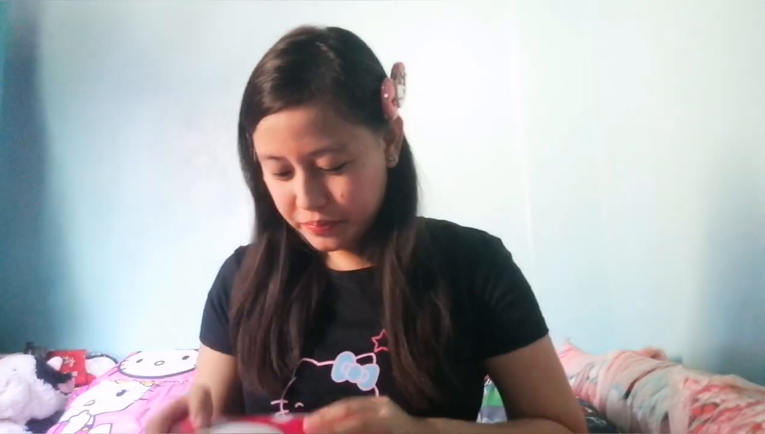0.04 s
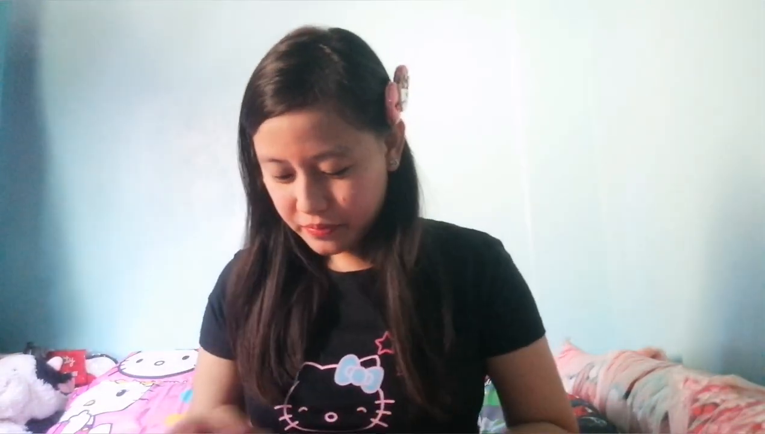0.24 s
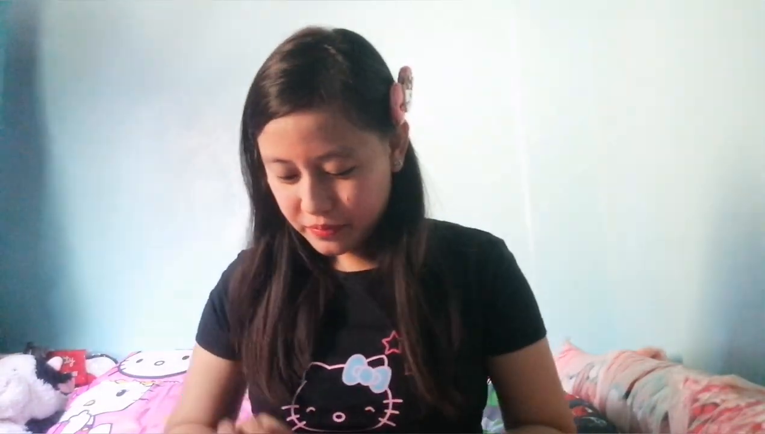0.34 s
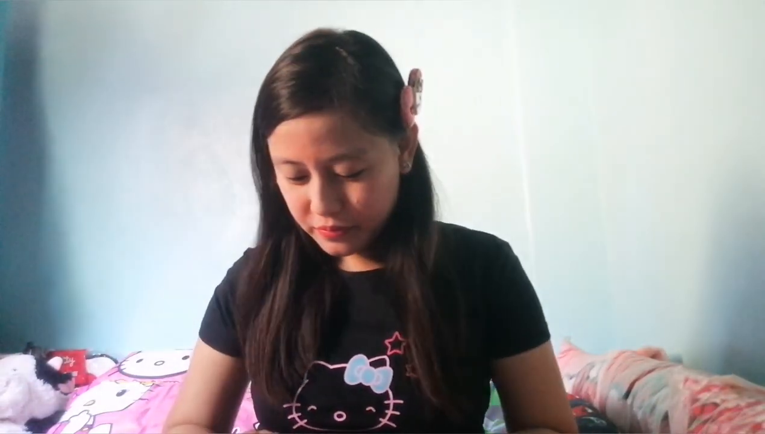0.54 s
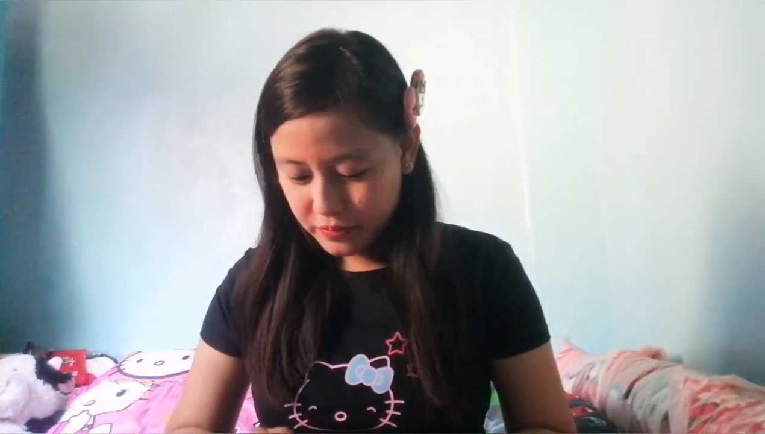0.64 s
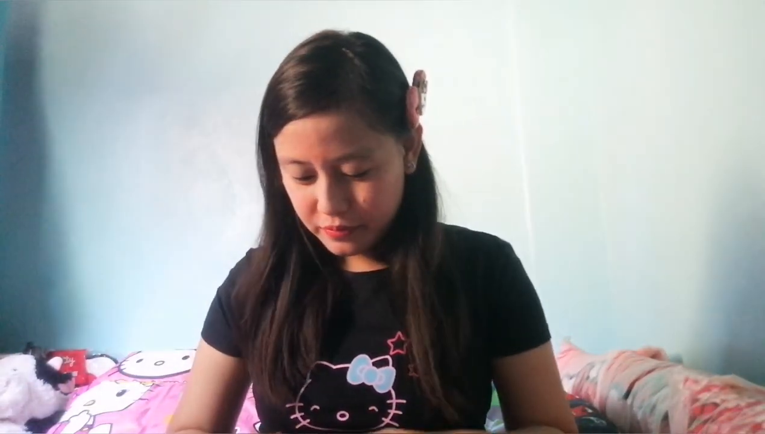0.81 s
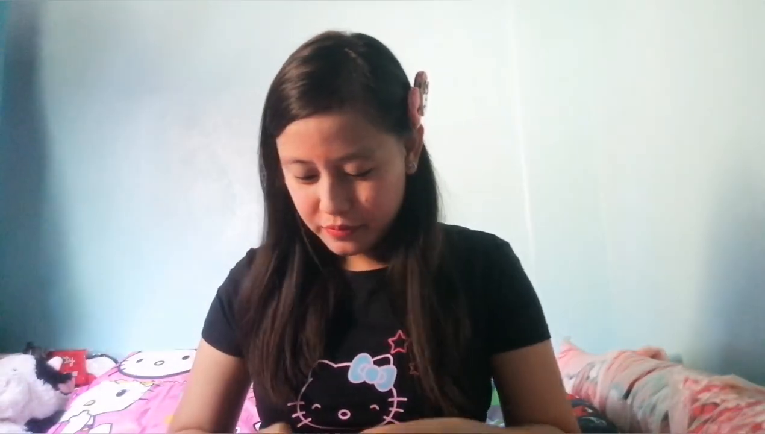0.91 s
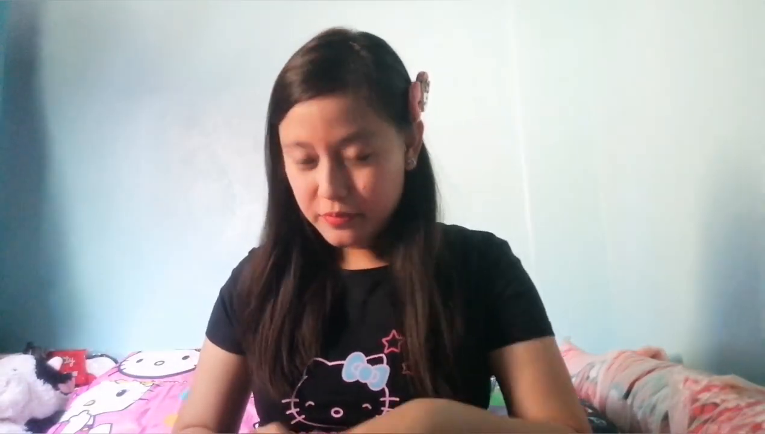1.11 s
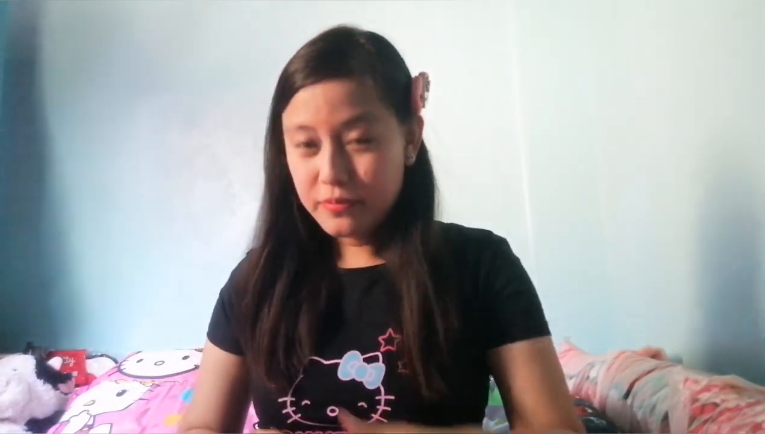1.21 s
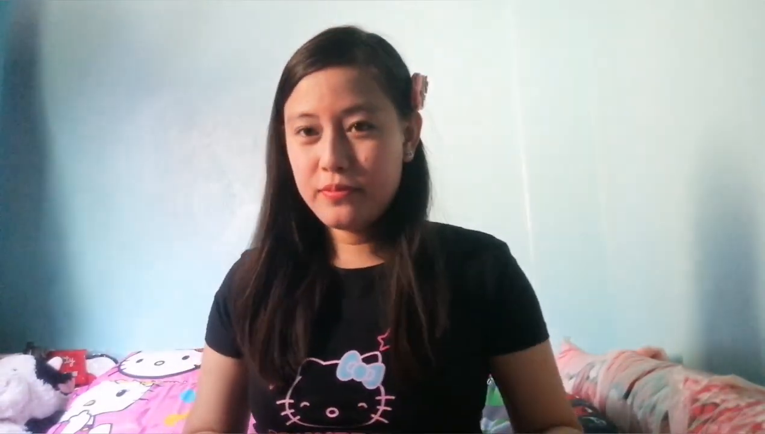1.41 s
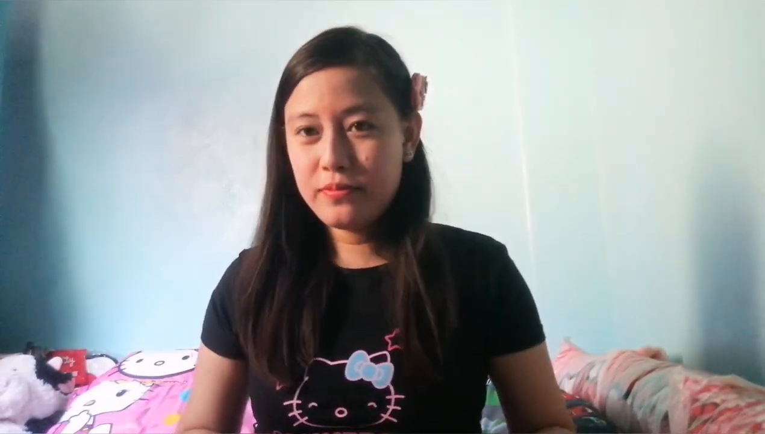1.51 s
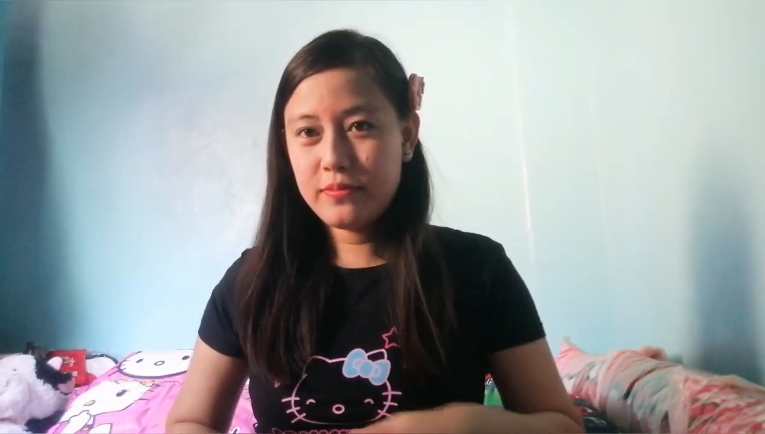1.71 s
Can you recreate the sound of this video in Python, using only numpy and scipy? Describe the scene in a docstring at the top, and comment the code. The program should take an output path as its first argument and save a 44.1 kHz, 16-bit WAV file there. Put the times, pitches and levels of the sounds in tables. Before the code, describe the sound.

A small cardboard box is opened by hand, close to the microphone in a quiet, soft-furnished room. Light finger slides lead to clustered hollow knocks at 0.1-0.26 seconds. After a lull, a flap snaps sharply at 0.67, scrapes until 0.78, then clicks and bumps low around 0.83-0.9. A dull tap and crease tick follow near 1.06-1.08, then faint room noise and a soft brush near 1.7.

```python
"""Light finger slides and hollow knocks give way to a snap, a short scrape and a low bump:
a small cardboard box is opened by hand, close to a microphone in a quiet soft-furnished room.
Blows swing damped panel modes, ring the hollow and add noise bursts for the crunching fibres.
Slides and scrape are filtered stick-slip clicks; the snap is a noise burst; creases tick and
the box thuds through short damped swings. Sparse reflections add the room."""
import sys
import numpy as np
from scipy import signal
from scipy.fft import rfft, irfft
from scipy.io import wavfile

SR = 44100
rng = np.random.default_rng(int(sys.argv[2]) if len(sys.argv) > 2 else 0)


def dump_mix(stems):
    """Bounce the given channels to the path in sys.argv[1] as a 16-bit WAV at rate SR."""
    frames = np.atleast_2d(stems).T  # one column per channel
    limited = np.clip(frames, -1, 1)  # hard clip at full scale
    pcm = np.round(limited * 32767).astype(np.int16)
    wavfile.write(sys.argv[1], SR, pcm)


N = 77175


def amp(db):
    """Decibels to gain."""
    return 10 ** (np.asarray(db) / 20)


def unit(x):
    """Scales to rms 1."""
    return x / np.sqrt(np.mean(x ** 2) + 1e-20)


def read(points, hz):
    """Reads a curve of (frequency, value) points on a log-frequency axis."""
    f, value = np.transpose(points)
    return np.interp(np.log(hz + 1), np.log(f + 1), value)


def since(start):
    """Seconds since start, zero before it."""
    return np.maximum(np.arange(N) / SR - start, 0)


def bins():
    """Frequencies of the full-length spectrum, in Hz."""
    return np.fft.rfftfreq(N, 1 / SR)


def decay(t, t60):
    """Exponential fade that drops 60 dB in t60 seconds."""
    return np.exp(-np.log(1000) * t / t60)


def noise():
    """Two unrelated channels of white noise."""
    return rng.standard_normal((2, N))


def spread(pair, gain, likeness=None, balance=None):
    """Colours two unrelated signals and blends them into a stereo pair of rms 1."""
    # stereo image of the box: (frequency [Hz], left-right likeness [-1 to 1])
    box_likeness = [(100, .97), (450, 0.96), (800, 0.53), (1400, 0.19), (3000, 0.77), (6000, 0.19),
                    (9000, 0.079), (15000, 0)]
    # stereo lean of the box: (frequency [Hz], left minus right [dB])
    box_balance = [(100, 2.5), (400, -0.5), (700, -3), (1290, -7), (2380, 5.5), (4400, -1), (8000, 8.5),
                   (15000, -7)]
    likeness = box_likeness if likeness is None else likeness
    balance = box_balance if balance is None else balance

    a, b = rfft(pair)
    same = np.clip(read(likeness, bins()), -1, 1)
    lean = read(balance, bins()) / 2
    left = a * amp(lean)
    right = (same * a + np.sqrt(1 - same ** 2) * b) * amp(-lean)
    return unit(irfft(np.array([left, right]) * gain, N))


def slips():
    """Two trains of tiny stick-slip clicks of paper fibres, of uneven size and random sign."""
    slips_per_s, size_spread_db = 5000, 1
    size = amp(size_spread_db * np.minimum(rng.exponential(1, (2, N)), 4))
    sign = rng.choice([-1, 1], (2, N))
    return size * sign * (rng.random((2, N)) < slips_per_s / SR)


def flex(start, hz, swell):
    """A damped panel swings up, its envelope peaking after the swell time, then dies away."""
    t = since(start)
    u = t / swell
    return u ** 2 * np.exp(2 - 2 * u) * np.sin(2 * np.pi * hz * t)


def ring(start, modes):
    """Sine modes (Hz, dB, t60) struck at one moment die exponentially."""
    t = since(start)
    return sum(amp(db - 60 * t / t60) * np.sin(2 * np.pi * hz * t) for hz, db, t60 in modes)


def card():
    """Complex gain of the stiff card's narrow resonances, added to a flat response."""
    # resonances shared by scrape and crunch: (frequency [Hz], width [Hz], level [dB])
    resonances = [(934, 63, 6), (1136, 22.5, 8.5), (1372, 22, 9), (1723, 12, 13), (1788, 47, 4),
                  (1890, 33, 7.5), (3322, 43, -11), (3543, 21, -9), (3730, 50, -10.5)]
    return 1 + sum(amp(db) / (1 + 2j * (bins() - hz) / width) for hz, width, db in resonances)


def tail(x, t60, gap):
    """Sparse dying reflections, different on each side, start after a gap in seconds."""
    t = np.arange(SR // 3) / SR
    signs = rng.choice([-1, 1], (2, len(t)))
    taps = signs * (rng.random((2, len(t))) < .1) * (t > gap)
    taps = taps * decay(t, t60)
    return signal.fftconvolve(np.atleast_2d(x), taps / np.linalg.norm(taps[0]), axes=1)[:, :N]


def air():
    """Quiet steady room noise: white noise through a falling spectrum."""
    # room noise colour: (frequency [Hz], level [dB])
    air_colour = [(12, -36), (20, -5), (86, -3.5), (142, -14), (204, -7.5), (319, -18.5), (357, -12.5),
                  (607, -11.5), (1260, -20), (1660, -23), (2820, -23.5), (7310, -39), (8650, -49.5),
                  (12400, -46), (16000, -63)]
    # its stereo image: (frequency [Hz], left-right likeness [-1 to 1])
    air_likeness = [(60, 0.017), (240, 0.9), (950, 0.015), (3770, -0.029), (15000, 0.27)]
    # its stereo lean: (frequency [Hz], left minus right [dB])
    air_balance = [(60, 4), (240, 3), (950, -1.5), (3770, 0.5), (15000, 2.5)]
    air_db = -57
    return amp(air_db) * spread(noise(), amp(read(air_colour, bins())), air_likeness, air_balance)


def slides():
    """Hands, sleeves and card slide lightly: stick-slip clicks swell and fade, each in its own band."""
    # strokes: (start [s], peak [s], end [s], level [dB], centre [Hz], width [octaves])
    strokes = [(0.0, 0.04, 0.39, -53, 470, 0.29), (0.0, 0.02, 0.23, -74.5, 9600, 0.4),
               (0.194, 0.243, 0.38, -66.5, 11000, 0.14), (0.244, 0.287, 0.42, -66, 9300, 0.62),
               (0.13, 0.266, 0.41, -54, 450, 0.33), (0.468, 0.522, 0.58, -53.5, 50.93, 0.47),
               (.8, .822, 0.815, -54, 6019, 0.16), (0.787, 0.831, .87, -49.5, 1940, 0.87),
               (0.825, 0.886, 1.0, -64, 3600, 0.85), (0.835, 0.888, .99, -65.5, 9100, 0.32),
               (0.862, 0.892, 0.975, -51, 465, 0.32), (0.907, 1.107, 1.17, -73.5, 2300, 1.7),
               (1.08, 1.309, 1.31, -55.5, 69.44, 1.24), (1.64, 1.75, 1.83, -67, 11500, 0.32),
               (1.721, 1.754, 1.764, -47.5, 4537, 0.53), (1.66, 1.745, 1.8, -57, 481.5, 0.38)]
    # microphone's treble colour on the slides, a dip near 8 kHz and a fall at the top:
    # (frequency [Hz], level [dB])
    mic_colour = [(100, -2), (5000, -0.5), (7400, 5.5), (8200, -4.5), (10000, 4), (12500, -2.5),
                  (15500, -8)]
    out = np.zeros((2, N))
    for start, peak, end, db, hz, width in strokes:
        octaves_off = np.log2((bins() + 1) / hz)
        band = np.exp(-(octaves_off / width) ** 2 / 4) * amp(read(mic_colour, bins()))
        swell = np.interp(since(0), [start, peak, end], [0, 1, 0]) ** 1.6
        out += amp(db) * swell * spread(slips(), band)
    return out


def knocks():
    """Each blow flexes a panel, rings the hollow and crunches the fibres at the contact."""
    # blows on the box: (time [s], panel pitch [Hz], panel level [dB], swell [s],
    # crunch level before doubling [dB], crunch tilt [dB per octave],
    # crunch rise constant [s], crunch t60 [s], left minus right [dB])
    blows = [(0.1078, 579, -12, .0021, -28.5, -2.5, 0.0014, .02, 1),
             (0.1169, 430, -12, 0.003, -32, -4, 0.0011, 0.06, 0),
             (0.1330, 428, -20.5, 0.003, -41, -1, 0.0019, 0.035, -2.5),
             (0.1386, 648, -25.5, 0.0017, -39, -5, 0.00067, 0.06, -1),
             (0.1470, 417, -24.5, 0.0039, -37, -7.5, 0.00073, 0.043, 1),
             (0.2170, 446, -39, 0.014, -55.5, -3.5, 0.0028, 0.11, 0),
             (0.2318, 437, -22, 0.0024, -40.5, -4.5, 0.0027, 0.11, 0.5),
             (0.2395, 336, -24, 0.00455, -49, 2.5, 0.0013, 0.027, -3.5),
             (0.2513, 546, -30, .003, -39.5, -3, 0.0012, 0.024, 2),
             (0.262, 450, -36, 0.0013, -57.5, 0.5, .002, 0.086, 3),
             (0.6641, 376, -35.5, 0.0022, -41.5, 4.5, 0.0024, 0.027, 2.5),
             (0.6720, 448, -23.5, 0.00268, -34.5, -2, 0.0011, 0.051, -1.5),
             (0.7468, 456, -28.5, .003, -34.5, 5, 0.00055, 0.014, 2.5),
             (0.8295, 457, -26, 0.00453, -41, 13, 0.00033, 0.0099, 2.5),
             (0.85, 422, -38, 0.0047, -73, 8, .002, .03, -4),
             (0.8670, 500, -46, 0.0081, -67, 12, .002, 0.025, 1),
             (0.8885, 492, -39, 0.0057, -51, 7.5, .002, 0.029, 2.5),
             (0.9009, 496, -45, 0.0045, -70, 0, 0.0022, .025, 1),
             (1.057, 199, -51.5, 0.013, -55.5, -0.5, 0.0026, 0.087, 5),
             (1.6889, 492, -45, 0.0051, -56.5, 2, 0.0033, 0.055, 2)]
    # panel modes: (multiple of panel pitch [ratio], level [dB], share of swell time [ratio])
    panel_modes = [(0.582, -13, 0.95), (1.001, 1.5, 0.91), (1.52, -12.5, 0.34), (2.15, -40, 0.47)]
    # the hollow box rings on after a blow: (frequency [Hz], level [dB], t60 [s])
    hollow_modes = [(215.1, -32.5, 0.5), (367, -33, 0.055), (437, -32, 0.088), (494, -27, 0.07),
                    (680, -28, .06), (756, -32, 0.07), (927, -39, 0.067), (1000, -34.5, 0.056)]
    # crunching fibres before tilt: (frequency [Hz], level [dB])
    crunch_colour = [(40, -56), (120, -32), (300, 3), (500, 8), (720, 6), (950, 0), (1400, -2), (2000, -7),
                     (2500, -2), (3100, -14), (3950, -8.5), (5200, -14), (6800, -21), (8200, -41.5),
                     (11500, -33.5), (16000, -52)]
    radiate_hz = 184  # a small panel radiates little below this

    body, crunch = np.zeros((2, N)), np.zeros((2, N))
    octaves = np.log2(np.clip(bins(), 500, 5000))  # the tilt acts only between these, in Hz
    colour = amp(read(crunch_colour, bins())) * card()
    for start, hz, db, swell, crunch_db, tilt_db, rise, t60, pan_db in blows:
        t = since(start)
        sides = amp([[pan_db / 2], [-pan_db / 2]])
        panel = sum(amp(level) * flex(start, hz * ratio, swell * share)
                    for ratio, level, share in panel_modes)
        body += sides * amp(db) * (panel + ring(start + swell, hollow_modes))
        burst = (1 - np.exp(-t / rise)) * decay(t, t60)
        fibres = spread(noise(), colour * amp(tilt_db * octaves))
        crunch += 2 * sides * amp(crunch_db) * burst * fibres
    radiation = signal.butter(2, radiate_hz, "high", fs=SR, output="sos")
    return signal.sosfilt(radiation, body) + crunch


def ticks():
    """A crease pops in short damped modes and the card around it shivers briefly."""
    # pops: (time [s], pitch [Hz], level [dB], swell [s])
    pop_events = [(.1088, 3946, -41, 0.0013), (.8298, 3520, -36.5, 0.00034), (.8895, 3940, -48, 0.0018),
                  (1.0817, 1990, -36.5, 0.0008), (1.083, 2430, -43.5, 0.00073)]
    # crease modes: (multiple of the pitch [ratio], level [dB])
    crease_modes = [(.6, -7.5), (1, 0), (1.35, -16), (1.86, -25), (2.33, -23)]
    shiver_t60_s, shiver_db = 0.045, -1
    pops = sum(amp(db + level) * flex(start, hz * ratio, swell)
               for start, hz, db, swell in pop_events for ratio, level in crease_modes)
    return pops + amp(shiver_db) * tail(pops, shiver_t60_s, 0)


def bumps():
    """The box settles and is shifted with soft thuds, each one low damped swing."""
    # thuds: (time [s], pitch [Hz], level [dB], swell [s])
    thuds = [(0.269, 72.6, -59, 0.004), (0.747, 85.5, -47.5, 0.012), (.846, 95.5, -32.5, .012),
             (0.992, 77.6, -54, 0.015), (1.325, 84.5, -53.5, 0.015)]
    return sum(amp(db) * flex(start, hz, swell) for start, hz, db, swell in thuds)


def scrape():
    """The flap drags through its slot: dense slips rasp unevenly and drive the flap's resonances."""
    # drag: (time [s], rasp below the split [dB], rasp above the split [dB], panel's drone [dB])
    drag = [(.668, -57, -55, -73), (0.674, -30, -46, -48), (0.687, -35.5, -40, -40),
            (.701, -35, -34.5, -33.5), (.716, -41.5, -36.5, -45), (.735, -36.5, -33.5, -52),
            (0.75, -27, -38.5, -44), (0.758, -45.5, -49.5, -54), (.785, -59, -61, -88)]
    # rasp of the card's edge: (frequency [Hz], level [dB])
    rasp_colour = [(40, -28), (100, -11), (170, 2), (300, -15), (480, 8), (600, -18), (950, -5.5),
                   (1140, 1), (1550, 0), (1800, -5), (2500, -7.5), (3600, 1), (4700, -5), (6800, -10),
                   (8100, -26.5), (9500, -19.5), (12000, -16.5), (15000, -31)]
    # flap resonances: (frequency [Hz], width [Hz], level [dB])
    flap_modes = [(304, 68, -5.5), (485, 160, -11.5), (708, 120, -4.5), (913, 32, -3.5)]
    split_hz = 1900
    catches_per_s, catch_db = 240, 0.5  # the edge catches and lets go unevenly

    s, *levels_db = np.transpose(drag)
    # silent before and after the drag
    dull, bright, drone = (amp(np.interp(since(0), s, db, -np.inf, -np.inf)) for db in levels_db)
    catch_band = np.exp(-(2 * (bins() / catches_per_s - 1)) ** 2)
    catches = unit(irfft(rfft(rng.standard_normal(N)) * catch_band, N))
    rasp = spread(slips(), amp(read(rasp_colour, bins())) * card())
    low = irfft(rfft(rasp) / (1 + (bins() / split_hz) ** 6), N)
    edge = (dull * low + bright * (rasp - low)) * amp(catch_db * catches)
    body = sum(amp(db) / (1 + 2j * (bins() - hz) / width) ** 2 for hz, width, db in flap_modes)
    return edge + drone * spread(slips(), body)


def snap():
    """The flap breaks free with one bright crack: an abrupt noise burst that dies quickly."""
    # crack colour: (frequency [Hz], level [dB])
    crack_colour = [(100, -28), (1000, -19), (2500, -7), (3700, 7), (5600, 1.5), (8200, -15), (11500, -3.5),
                    (16000, -22)]
    start_s, level_db, t60_s = .6729, -22, 0.007
    t = since(start_s)
    burst = (t > 0) * decay(t, t60_s)
    return amp(level_db) * burst * spread(noise(), amp(read(crack_colour, bins())))


def scene():
    """The box and the hands, with the room's reflections and steady noise."""
    room_t60_s, room_db, room_gap_s = 0.11, -11.5, 0.0031
    box = slides() + knocks() + ticks() + bumps() + scrape() + snap()
    return box + amp(room_db) * tail(box, room_t60_s, room_gap_s) + air()


def record(dry):
    """A steep linear-phase low-pass takes off the top of the treble."""
    edge_hz = 15400
    lowpass = signal.firwin(255, edge_hz, window=("kaiser", 8), fs=SR)
    return signal.oaconvolve(dry, lowpass[None], "same")


dry = scene()
out = record(dry)
dump_mix(out)
```